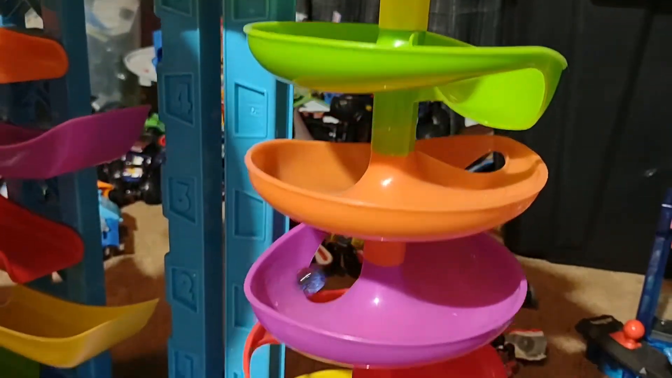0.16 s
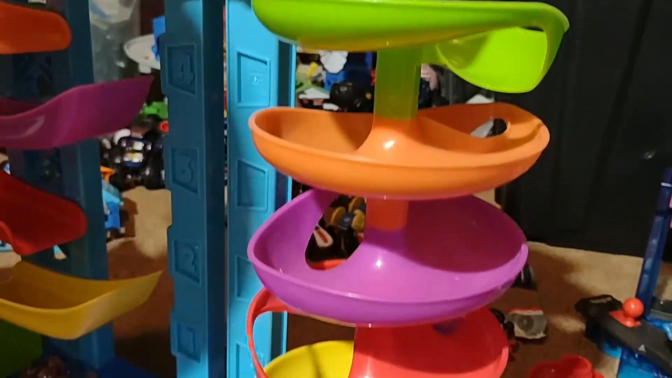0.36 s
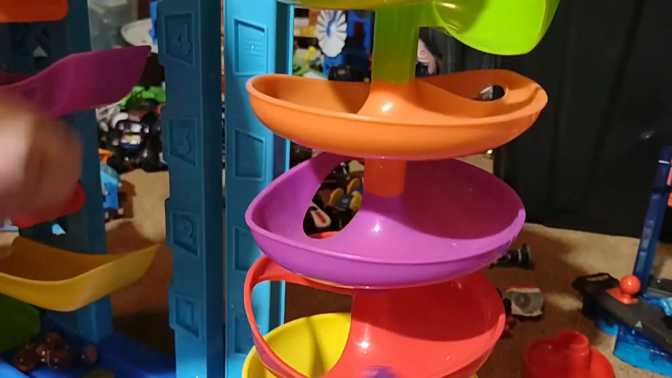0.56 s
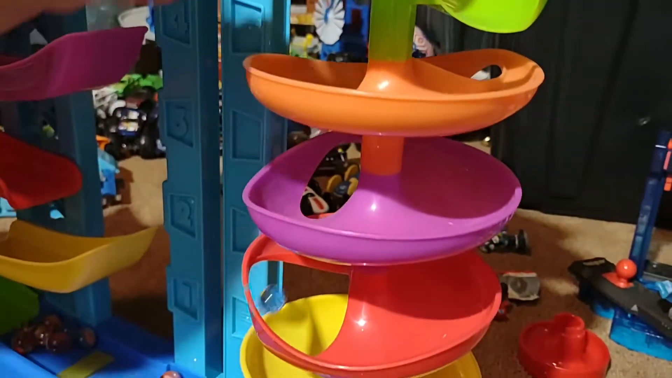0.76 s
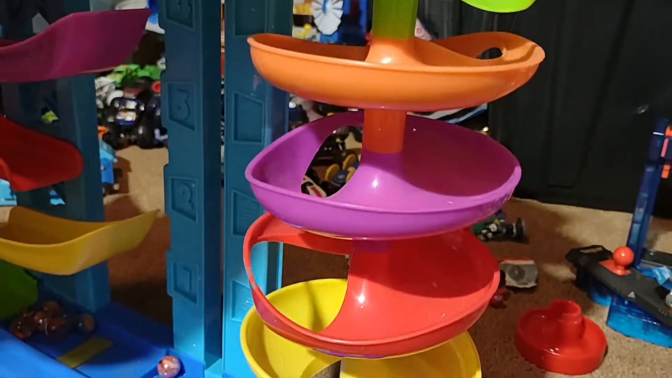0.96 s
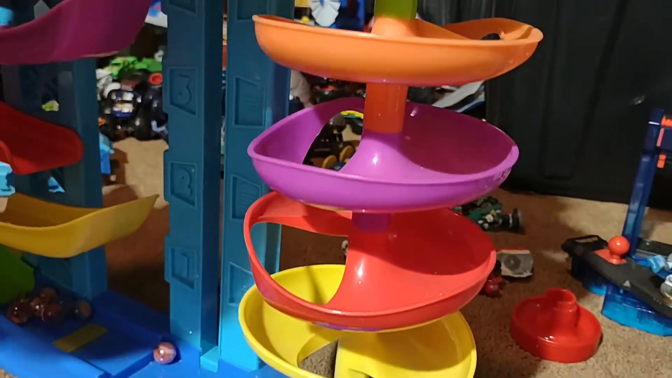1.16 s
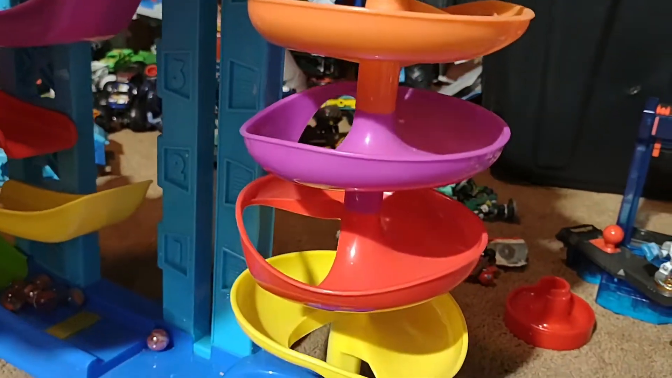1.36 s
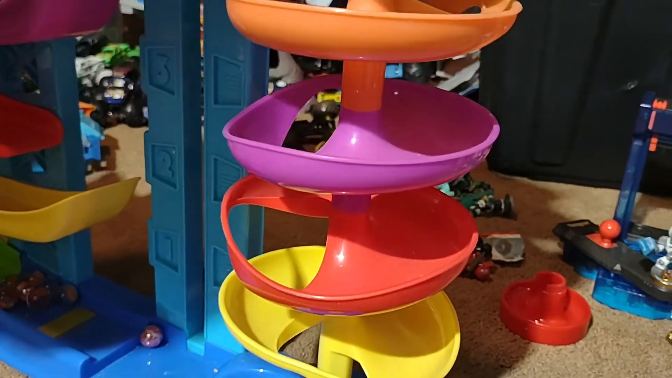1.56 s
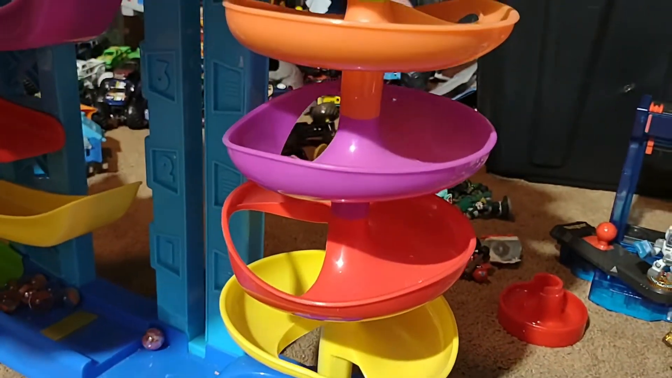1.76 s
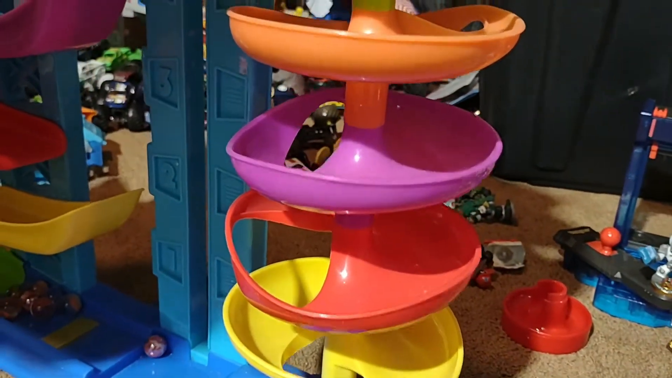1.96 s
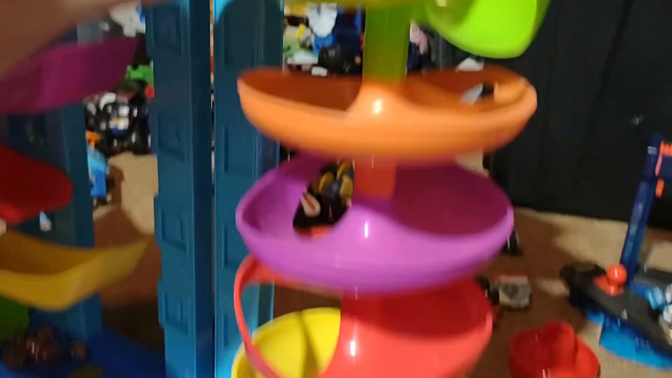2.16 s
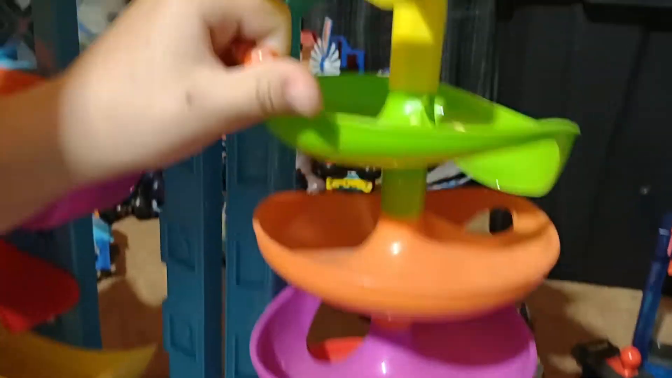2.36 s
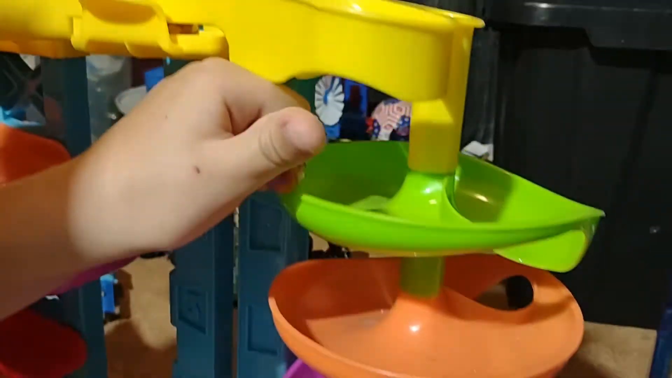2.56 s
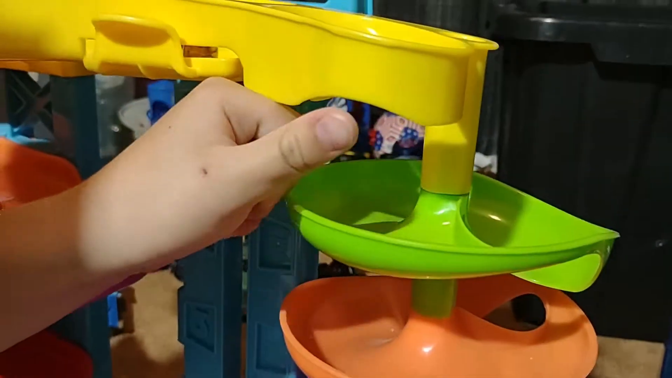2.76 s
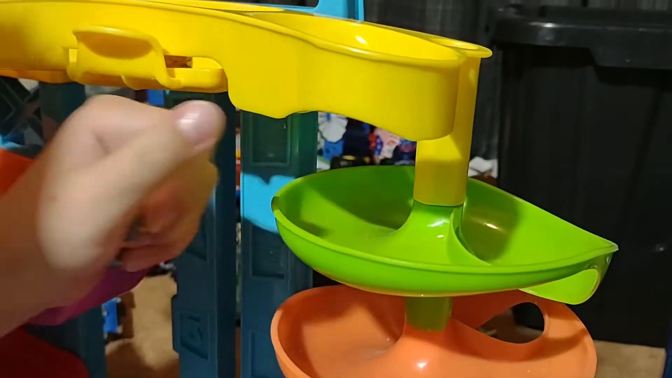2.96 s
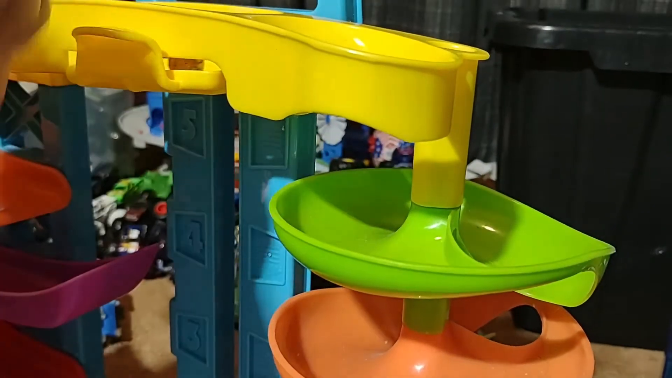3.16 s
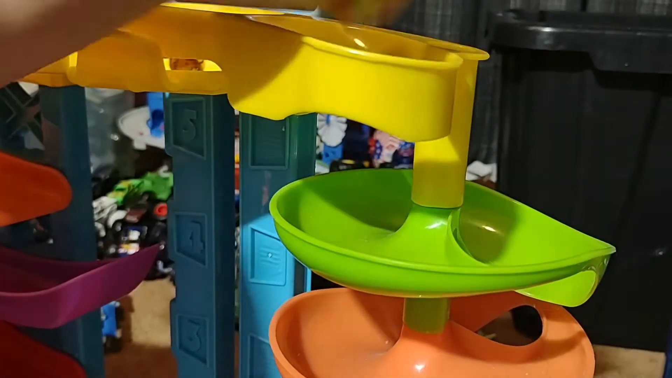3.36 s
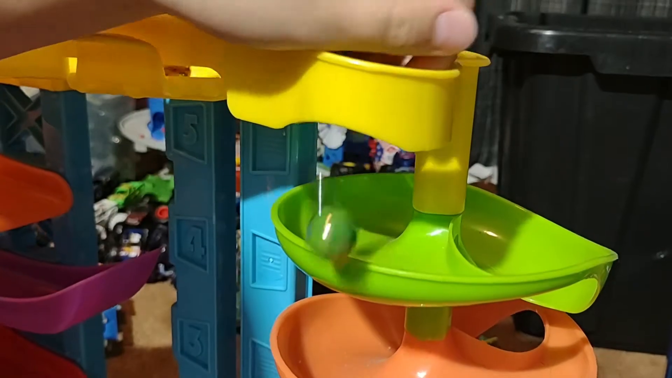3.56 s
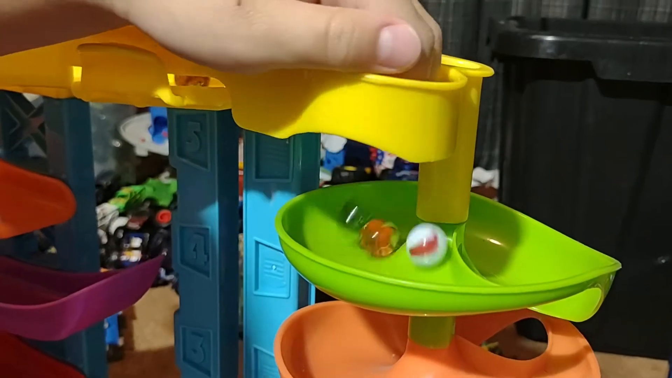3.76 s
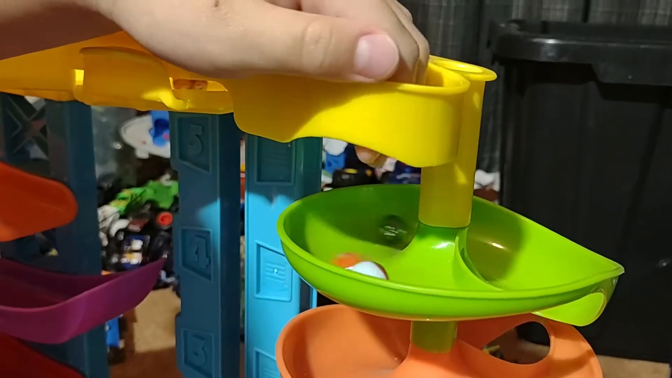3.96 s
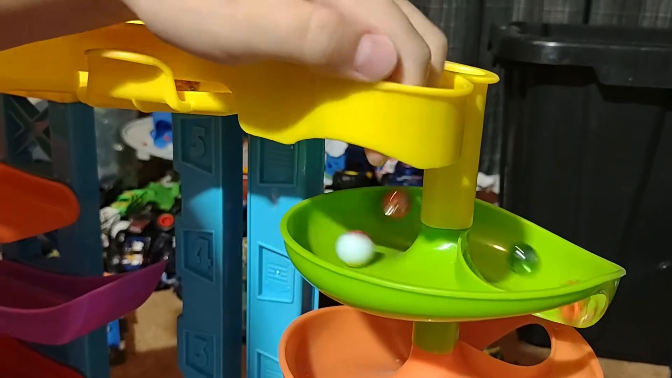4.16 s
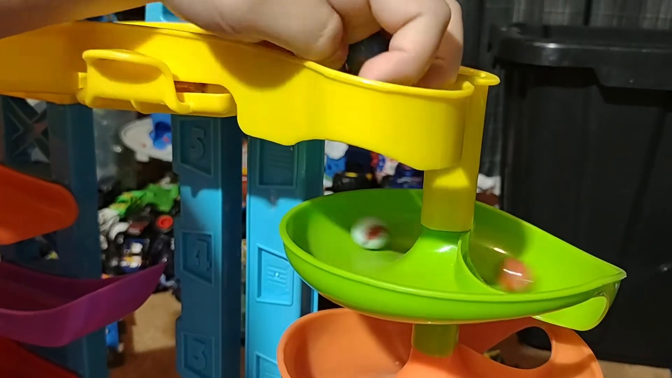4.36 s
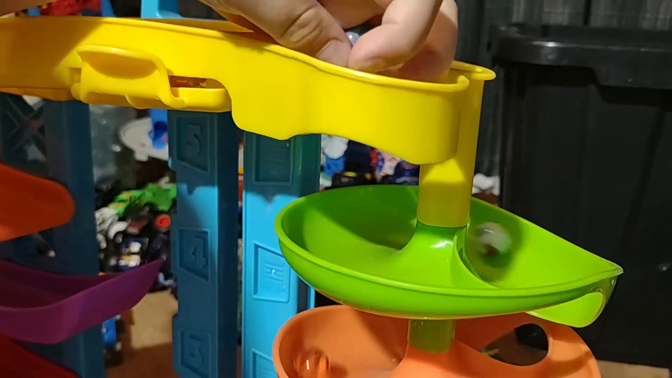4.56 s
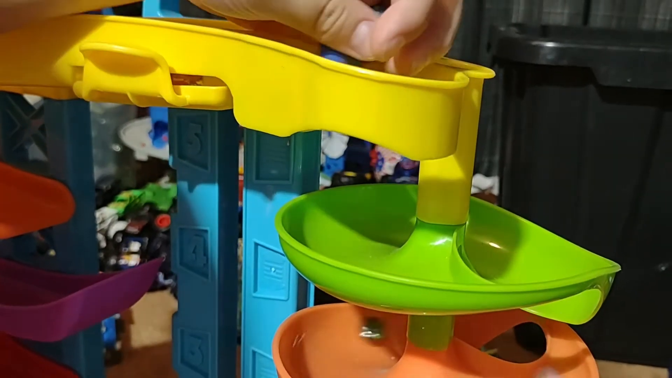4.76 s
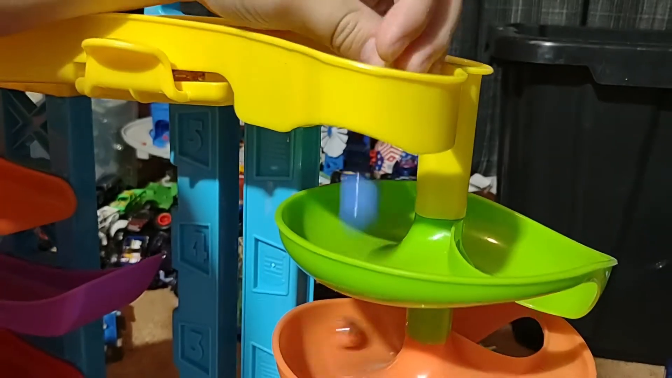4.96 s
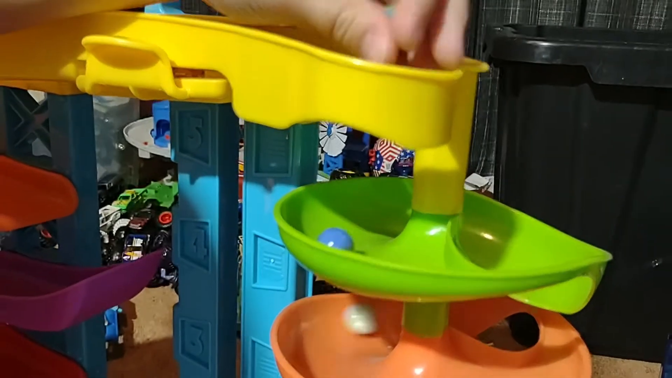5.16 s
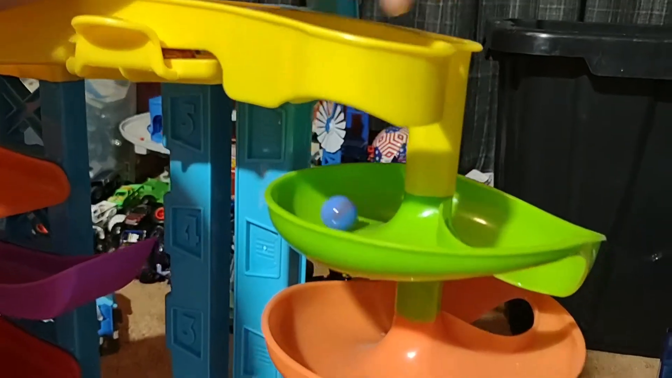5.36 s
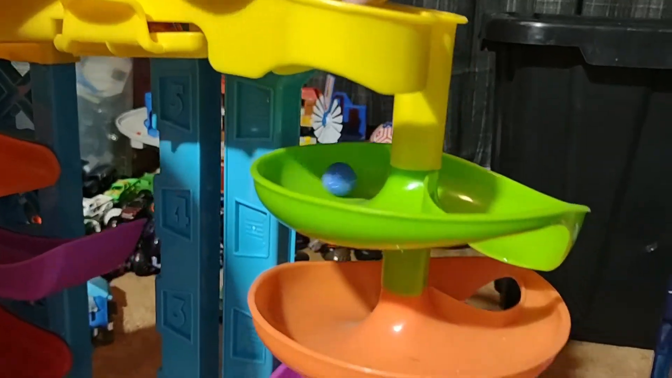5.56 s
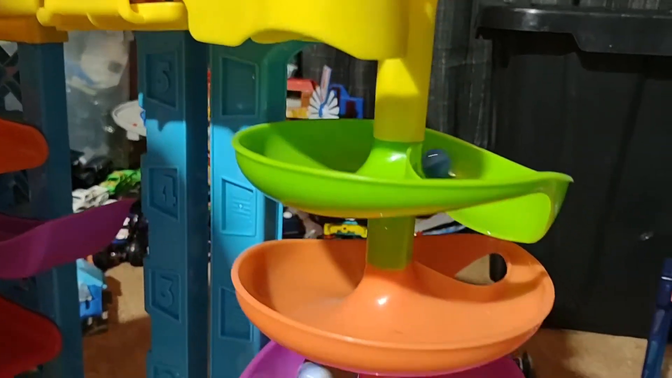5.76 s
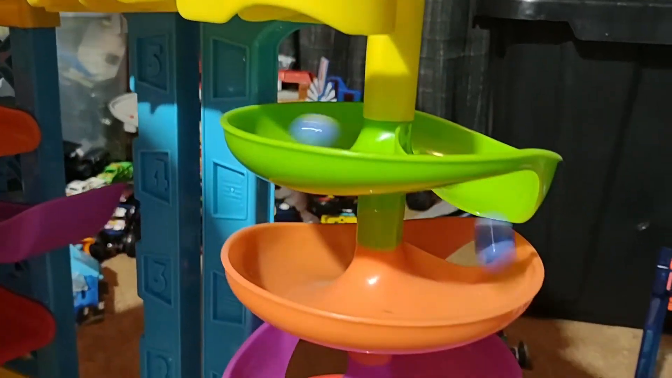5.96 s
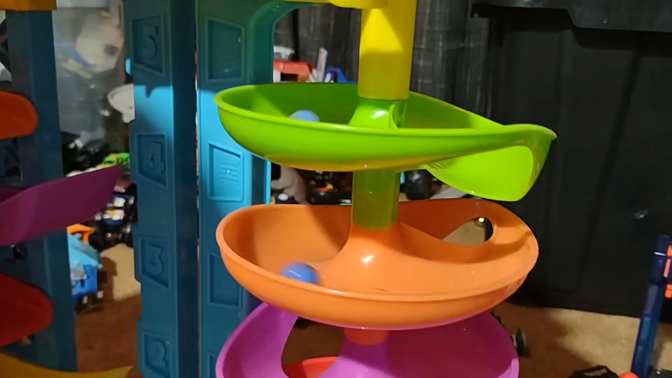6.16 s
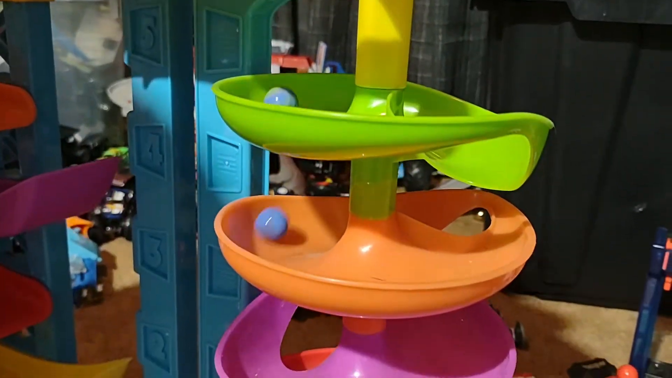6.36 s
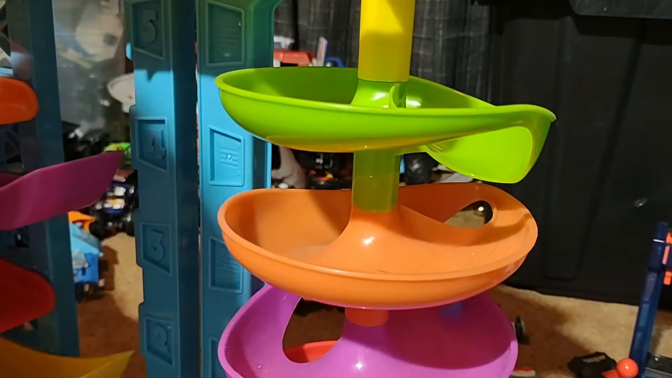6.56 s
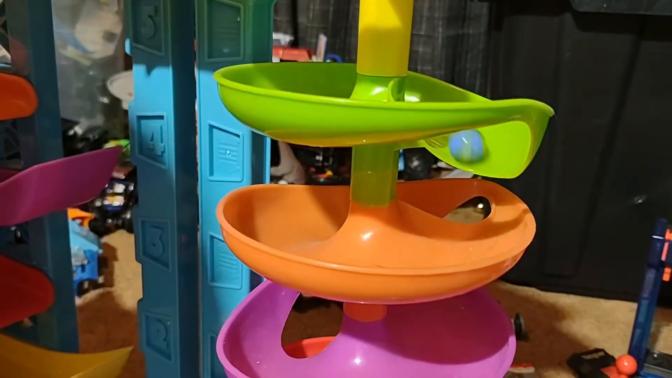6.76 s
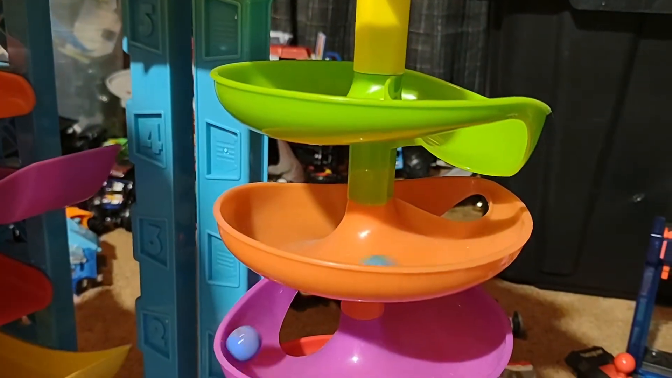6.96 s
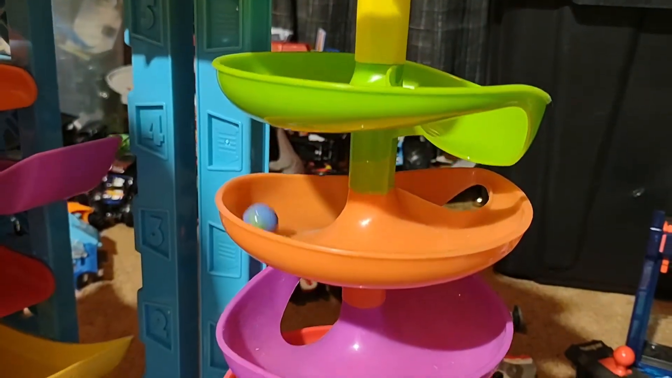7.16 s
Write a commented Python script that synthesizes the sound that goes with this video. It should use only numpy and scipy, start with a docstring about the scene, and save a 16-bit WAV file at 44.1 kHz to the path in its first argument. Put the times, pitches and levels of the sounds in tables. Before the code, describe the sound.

A toy marble tower of thin plastic trays stands close to a stereo microphone in a quiet indoor room with faint air noise and a low wavering hum. At 0 seconds marbles clack dryly and roll briefly, with further moderate knocks around 0.4 and a last few at 0.8 to 0.95. From 1 to about 3.4 it is nearly silent: tiny glass ticks, one light clack near 2.7, a soft bump at 3. At 3.45 marbles drop in, clattering sharply and quickly until 4.1. Spaced loud clacks follow at 4.3 and 4.4, then from 4.6 to 6.1 a dense run of bounces with lurching, grainy rolling. Around 6.3 to 6.6 hollow, clearer-pitched knocks tumble together. Last clacks fall near 6.7 and 7, with a little rolling and light glass ticks. Each hit has a short boxy plastic ring and quick diffuse tail.

```python
"""A dry clack of glass on plastic opens: marbles drop into a toy tower of spiral trays, close by in a playroom.
They bounce, click together, roll round the trays and fall on, in bursts with a pause between.
Contacts are bursts of shaped noise, prolonged by the decaying modes of the hollow tower and a diffuse tail.
Rolling is grainy, lurching noise; soft bumps are short decaying sines.
Beneath lies quiet air noise with a low, wavering hum."""
import sys
import numpy as np
from scipy import signal
from scipy.fft import rfft, irfft, next_fast_len
from scipy.io import wavfile
from scipy.ndimage import uniform_filter1d, map_coordinates

SR = 44100
rng = np.random.default_rng(int(sys.argv[2]) if len(sys.argv) > 2 else 0)


def waveform_to_disk(signal):
    """Save audio, clipped to [-1, 1], as 16-bit WAV at the path in sys.argv[1]."""
    frames = np.transpose(np.atleast_2d(signal))
    scaled = np.clip(frames, -1, 1) * 32767
    samples = np.round(scaled).astype(np.int16)
    wavfile.write(sys.argv[1], SR, samples)


N = 317961  # length in samples

# the quiet room's spectrum, relative: f/Hz, level/dB per Hz
AIR_SPECTRUM = [(25, -39.5), (45, -27), (70, -5.5), (130, -13.5), (170, -12), (240, -23.5), (350, -18.5),
                (700, -26), (1100, -30.5), (1450, -24.5), (2100, -30.5), (4000, -34.5), (10000, -40.5),
                (16000, -46.5)]
# low drones of the room, lifts on the air spectrum: f/Hz, width/Hz, lift/dB
HUM_DRONES = [(79, 29, 6.5), (122, 26, 18.5), (197, 28, 15)]
# soft blows to the toy: t/s, peak level/dB, f/Hz, t60/s
SOFT_BUMPS = [(0.262, -46.5, 185, 0.071), (0.933, -32.5, 381, 0.0705), (1.068, -47, 174.7, 0.05),
              (2.993, -35.5, 195.6, 0.018), (3.02, -50.5, 160, 0.17), (3.902, -26, 187, 0.023),
              (5.076, -31.5, 185, 0.066)]
# a tray under rolling glass, relative: f/Hz, level/dB per Hz
TRAY_SPECTRUM = [(40, -20), (80, -7), (125, 1.5), (200, -2), (300, -3.5), (450, -1), (570, -2), (700, 0),
                 (1000, -2), (1300, -0.5), (1680, -5.5), (2200, -7.5), (4000, -18), (16000, -49)]
# glass sliding on plastic, relative: f/Hz, level/dB per Hz
SCRAPE_SPECTRUM = [(500, -34.5), (1500, 0), (2800, -2), (5000, -2), (8000, 0), (12000, -4), (16000, -18.5)]
# marbles run round a tray: start t/s, end t/s, relative level/dB
TRAY_RUNS = [(.02, 0.26, -59.5), (0.535, 0.562, -53.5), (0.646, 0.709, -57), (0.756, .77, -60),
             (3.523, 3.98, -61), (4.126, 4.243, -46.5), (4.5, 5.29, -47), (5.38, 5.574, -52),
             (5.62, 5.674, -43), (5.742, 5.794, -45), (5.84, 5.862, -47), (6.14, 6.478, -49.5),
             (6.73, 6.825, -47), (7.05, 7.214, -54.5)]
# an average clack on a tray, relative: f/Hz, level/dB
CLACK_SPECTRUM = [(40, -46), (110, -28.5), (250, -19), (600, -14), (1000, -8), (1700, -2), (2800, -6),
                  (4000, -12), (5600, -15.5), (8000, -14.5), (11300, -20), (14000, -27.5), (16500, -36.5)]
# modes of the hollow tower: f/Hz, relative level/dB, t60/s
TOWER_MODES = [(350.3, 1.5, .25), (442.5, 3, 0.26), (513, 0, 0.35), (665, 1, 0.19), (932, -2, 0.26),
               (1126, -1.5, 0.1), (1378, -4.5, 0.13), (1460, 0, 0.19), (1685, 4, 0.079), (1734, -3, .13),
               (2087, -5, 0.088), (2170, -7.5, 0.1), (2336, -5, .15), (2648, -4.5, 0.18),
               (3300, -1.5, 0.14), (3730, -3.5, 0.084), (4126, -6, .06)]
# how long tower and room ring on: f/Hz, t60/s
TAIL_T60 = [(100, 0.24), (400, 0.26), (1600, 0.22), (4000, 0.19), (9000, 0.19), (16000, 0.24)]
# diffuse share of a contact, relative: f/Hz, level/dB
TAIL_SPECTRUM = [(100, 7), (200, 1), (400, -3.5), (900, -5), (1600, -7), (2800, -7.5), (5000, -9),
                 (9000, -10.5), (16000, -10.5)]
# left-right likeness of the direct sound: f/Hz, likeness (1 = same, 0 = unrelated)
DIRECT_LIKENESS = [(100, .9), (500, 1), (1200, 0.7), (2000, -0.042), (3500, 0.073), (9000, -0.021)]
# left-right likeness of diffuse sound: f/Hz, likeness (1 = same, 0 = unrelated)
DIFFUSE_LIKENESS = [(30, .5), (100, .87), (450, 0.76), (900, 0.31), (1700, 0.073), (4000, 0)]
# tower as the two microphones hear it: f/Hz, left minus right level/dB
STEREO_LEAN = [(100, -2), (300, 2.5), (600, -1), (1300, -3), (2600, -2), (5000, 0.5), (9000, 0),
               (14000, 1.5)]
# a marble lands on a tray or hits its rim: t/s, relative level/dB, knock (tray bass)/dB,
# hardness (treble)/dB, ring of the struck spot f/Hz
TRAY_CLACKS = [(.0014, 7, 11.5, 20, 4070), (.0615, 9, 8.5, 8, 7700), (0.0923, 0.5, 12.5, 4, 1300),
               (0.3313, 9, 7, 14, 6080), (0.3998, -3, 16, 17.5, 4460), (0.4495, 15.5, 2.5, -1.5, 950),
               (0.4625, 7, -5, -29, 1470), (0.837, 5, 14.5, 19.5, 4100), (0.898, 8.5, 5.5, 9.5, 1580),
               (1.3658, -17.5, 5, -11.5, 1080), (2.6587, 10, -10.5, -11, 2870),
               (3.458, 10.5, -11, -2, 2260), (3.5032, 13.5, -25, -5.5, 3280), (3.5633, 2.5, -24, -1, 3360),
               (3.581, 7, -20, -2, 2710), (3.595, -3, 14, 20, 3630), (3.6039, 20, -17, 13, 2790),
               (3.676, 22.5, -4.5, 6, 2850), (3.7215, 15, -3, 2, 2830), (3.7535, 9, 9.5, 14.5, 2300),
               (3.7679, 4, -15, 13, 2420), (3.774, 11.5, 9.5, 18, 2570), (3.8067, 17, 9, 12.5, 3360),
               (3.8739, 14.5, 11, 4.5, 3050), (3.923, 14, 2, -2, 1110), (3.9461, 1.5, 19.5, 4, 1100),
               (3.9665, 5.5, -14, 7.5, 2530), (4.0412, 27.5, -8, -2.5, 2600), (4.0597, 12, 13.5, 5, 1086),
               (4.3397, 19, 9.5, 2, 2050), (4.4159, 22, 5, 1.5, 2230), (4.5875, 1, 11.5, -4, 1620),
               (4.6485, 21.5, 5.5, 4, 1990), (4.6532, 13, 9, -5, 1660), (4.681, 11, -7, -10, 1180),
               (4.8593, 22.5, 2, -1, 2040), (4.8919, 7.5, 10, -4, 1730), (4.9306, 8.5, 10.5, 13.5, 1370),
               (4.9567, 20, 8.5, 3, 1660), (4.9962, 11, 10, 6.5, 10100), (5.0276, 11.5, 5, -15, 1700),
               (5.07, 20.5, 10.5, 9, 3000), (5.1319, 14.5, 1.5, -1.5, 2560), (5.227, 9.5, 11.5, 13, 1650),
               (5.2921, 18.5, 9, 2.5, 1700), (5.3954, 7, 15.5, 12, 1530), (5.4095, 19.5, 5, -2.5, 1470),
               (5.4507, 21.5, 4, 3, 1690), (5.5125, 22.5, 2.5, -30, 1720), (5.5192, 19, 0.5, 8.5, 2960),
               (5.745, 4.5, 14.5, 15, 850), (5.752, 10, 10.5, -8, 1850), (5.9061, 19.5, 6.5, 5.5, 1740),
               (5.9189, 0.5, 11, 25.5, 1350), (5.9438, 17, 5, 7.5, 1400), (5.9494, 17, 3.5, -19, 450),
               (5.9864, 16.5, -5, -8, 694), (6.0053, 18.5, 11, 14, 2880), (6.0278, 14, 7.5, 11, 425),
               (6.0703, 21.5, 0, 8, 1460), (6.077, 22, -14, -1.5, 1470), (6.1122, 10.5, 15.5, 7.5, 2820),
               (6.208, 15.5, 6.5, 11.5, 3270), (6.2667, 12.5, -17, -12, 3060),
               (6.5991, 8.5, 11.5, 1.5, 1530), (6.6623, 1, 22.5, 25, 2830), (6.6858, 19, 7.5, 2, 1575),
               (6.9622, 21.5, -1, -1.5, 1460), (7.0152, 9.5, 13.5, 5, 2290), (7.04, -6, 18, 23.5, 8140)]
# a marble drops into a hollow part, or strikes the column, and it rings at one clear pitch: # t/s, relative
# level/dB, hardness (treble)/dB, ring f/Hz
RINGING_HITS = [(.9279, 4.5, 15, 3650), (6.285, 16.5, 4.5, 3790), (6.377, 22.5, -8, 3900),
                (6.3913, 10, 2, 656), (6.4743, 19, -0.5, 867), (6.498, 9, 21.5, 820),
                (6.5179, 0.5, 29, 700), (6.5421, 16.5, 2, 815), (6.5499, 10.5, 13, 1040),
                (6.575, 6, 6, 1020)]
# marbles touch lightly, glass on glass: t/s, relative level/dB, ring f/Hz
GLASS_TICKS = [(0.174, -24, 6850), (0.1896, -24.5, 6050), (1.2855, -17, 4400), (1.388, -36, 5700),
               (1.4308, -28.5, 4690), (1.7947, -47, 8830), (2.181, -42, 6650), (3.085, -41, 3900),
               (3.42, -28.5, 4600), (6.912, -14, 3330), (7.0597, -11, 10500), (7.19, -20, 9900)]

CLACK_RING_DB = 5.5  # how far the struck spot stands out
DROP_KNOCK_DB, DROP_RING_DB, DROP_TAIL_DB = 5, 16.5, 1.5  # bass, ring, tail against a clack's
TICK_KNOCK_DB, TICK_HARD_DB, TICK_RING_DB = 0, 20, 14  # bass, treble, ring
# a marble hops once after a clack: median flight, log scatter, loss
REBOUND_S, REBOUND_SPREAD, REBOUND_LOSS_DB = 0.013, 0.35, 17.5
PAN_SPREAD_DB = 3  # contacts fall to either side of the column
RUN_ATTACK_S, RUN_RELEASE_S = 0.023, 0.055  # rise up to the start, time constant after the end
TOP_HZ = 16000  # band limit


def amp(db):
    """Decibels to linear gain."""
    return 10 ** (np.asarray(db) / 20)


def unit(x):
    """Scale to rms 1."""
    return x / np.sqrt(np.mean(x ** 2) + 1e-20)


def along(points, hz):
    """Read a curve of (Hz, value) points on a log frequency axis."""
    f, value = np.transpose(points)
    return np.interp(np.log(hz + 1), np.log(f + 1), value)


def wobble(rate):
    """A smooth random curve with rate knots a second."""
    knots = rng.standard_normal(int(N * rate / SR) + 4)
    return map_coordinates(knots, [np.arange(N) * rate / SR])


def filtered(x, response):
    """Shape a sound by a gain response over frequency."""
    m = next_fast_len(N + SR // 2)
    hz = np.fft.rfftfreq(m, 1 / SR)
    return irfft(rfft(x, m) * response(hz), m)[..., :N]


def causal(db):
    """The minimum-phase response with these dB gains, so that energy comes early."""
    cepstrum = irfft(np.log(amp(db)))
    half = len(cepstrum) // 2
    cepstrum[1:half] *= 2
    cepstrum[half + 1:] = 0
    return np.exp(rfft(cepstrum))


def stereo(pair, alike, hz):
    """Blend two unrelated spectra into left and right with a given likeness."""
    turn = np.arccos(np.clip(along(alike, hz), -0.99, 0.99)) / 2
    mid = pair[0] * np.cos(turn)
    side = pair[1] * np.sin(turn)
    return np.array([mid + side, mid - side])


def coloured(pair, colour):
    """Turn two noises into diffuse stereo of rms 1; colour gives dB for Hz."""
    m = next_fast_len(N + SR // 2)
    hz = np.fft.rfftfreq(m, 1 / SR)
    spectra = stereo(rfft(pair, m), DIFFUSE_LIKENESS, hz) * amp(colour(hz))
    return unit(irfft(spectra, m)[:, :N])


def add(track, s, sound):
    """Mix a sound in at time s."""
    part = track[..., max(round(s * SR), 0):][..., :sound.shape[-1]]
    part += sound[..., :part.shape[-1]]


def room_tone(level_db):
    """Soft air noise, swelling at a few low pitches into a wavering hum."""
    def colour(hz):
        drones = sum(db / (1 + (2 * (hz - centre) / width) ** 2) for centre, width, db in HUM_DRONES)
        return along(AIR_SPECTRUM, hz) + drones

    return amp(level_db) * coloured(rng.standard_normal((2, N)), colour)


def bumps(rise_cycles):
    """Soft blows push the toy for a cycle or a few, with no click."""
    out = np.zeros(N)
    t = np.arange(SR // 4) / SR
    for s, db, hz, t60 in SOFT_BUMPS:
        rise = 1 - np.exp(-(t * hz / rise_cycles) ** 2)
        push = np.sin(2 * np.pi * hz * t) * amp(-60 * t / t60) * rise
        add(out, s, amp(db) * push / np.abs(push).max())
    return out


def run_strength():
    """Each run builds up, holds its level and dies away as the marble leaves."""
    t = np.arange(N) / SR
    strength = np.zeros(N)
    for start, end, db in TRAY_RUNS:
        attack = np.clip(1 + (t - start) / RUN_ATTACK_S, 0, 1)  # full level at the start time
        release = np.exp(-np.maximum(t - end, 0) / RUN_RELEASE_S)
        strength += amp(db) * attack * release
    return strength


def tower_db(hz, peak_db):
    """The tower's modes as peaks in dB under a steady drive; longer rings make narrower peaks."""
    return sum(peak_db * amp(db) / (1 + ((hz - centre) * t60 / 4) ** 2)
               for centre, db, t60 in TOWER_MODES)


def rolling(rumble_db, scrape_db, grit_db, lurch_db, crackle_db):
    """Glass rolls over tiny bumps in the plastic: a lurching, grainy rumble with a fine scrape on top."""
    grit = rng.standard_normal((2, N)) * amp(grit_db * wobble(300))
    crackle = rng.standard_normal((2, N)) * amp(crackle_db * wobble(310))
    rumble = coloured(grit, lambda hz: along(TRAY_SPECTRUM, hz) + tower_db(hz, peak_db=7.0))
    scrape = coloured(crackle, lambda hz: along(SCRAPE_SPECTRUM, hz))
    surface = amp(rumble_db) * rumble + amp(scrape_db) * scrape
    return run_strength() * amp(lurch_db * wobble(40)) * surface


def contacts():
    """Every blow as (t/s, level dB, knock dB, hardness dB, ring Hz, ring dB, tail dB)."""
    flights = REBOUND_S * np.exp(REBOUND_SPREAD * rng.standard_normal(len(TRAY_CLACKS)))
    blows = [(*clack, CLACK_RING_DB, 0) for clack in TRAY_CLACKS]
    hops = [(s + flight, db - REBOUND_LOSS_DB, *colour)
            for flight, (s, db, *colour) in zip(flights, blows)]
    drops = [(s, db, DROP_KNOCK_DB, hard_db, hz, DROP_RING_DB, DROP_TAIL_DB)
             for s, db, hard_db, hz in RINGING_HITS]
    ticks = [(s, db, TICK_KNOCK_DB, TICK_HARD_DB, hz, TICK_RING_DB, 0) for s, db, hz in GLASS_TICKS]
    return blows + drops + ticks + hops


def flex(t, hz, rise, t60, even_hz):
    """Bending waves criss-cross the thin tray for a few ms: two noise spectra, evened to a flat average."""
    burst = rng.standard_normal((2, len(t))) * (1 - np.exp(-t / rise)) * amp(-60 * t / t60)
    waves = rfft(burst)
    power = uniform_filter1d(np.abs(waves) ** 2, max(int(even_hz / hz[1]), 1), axis=1)
    return waves * [causal(-10 * np.log10(np.abs(p) + 1e-9)) for p in power]


def afterring(hz, build, size):
    """The room answers after a short gap, each frequency dying at its own speed: two flat-average spectra."""
    f, t, cells = signal.stft(rng.standard_normal((2, size)), SR, nperseg=256)
    decay = amp(-60 * t / along(TAIL_T60, f)[:, None])
    fade = decay * (1 - np.exp(-(t / build) ** 4))
    fade /= np.sqrt(np.mean(fade ** 2, axis=1, keepdims=True) * size)
    return rfft(signal.istft(cells * fade, SR, nperseg=256)[1][:, :size])


def chime(modes, t, scatter_db):
    """Decaying modes, each of unit energy at 0 dB, struck at new strengths: two spectra."""
    hz, db, t60 = np.transpose(modes)
    fade = np.exp(-np.log(1000) * t / t60[:, None])
    energy = (fade ** 2).sum(axis=1) / 2
    size = amp(db + scatter_db * rng.standard_normal(len(hz))) / np.sqrt(energy)
    # short waves reach the two microphones out of step
    phase = rng.uniform(0, 2 * np.pi, len(hz)) + rng.standard_normal((2, len(hz))) * hz / 2400
    turn = 2 * np.pi * hz[:, None] * t
    sines = (size * np.cos(phase)) @ (fade * np.sin(turn))
    cosines = (size * np.sin(phase)) @ (fade * np.cos(turn))
    return rfft(sines + cosines)


def clacks(knock_hz, hard_hz, dull_hz, ring_octaves, direct_db, tail_db, modes_db,
           spot_db, spot_t60, spot_fade, size):
    """Each contact flexes a tray; its colour depends on where and how hard the glass lands."""
    out = np.zeros((2, N))
    t, hz = np.arange(size) / SR, np.fft.rfftfreq(size, 1 / SR)
    bass = 1 / (1 + (hz / knock_hz) ** 2)
    treble = 1 - 1 / (1 + (hz / hard_hz) ** 3)
    top = 1 - 1 / (1 + (hz / dull_hz) ** 4)
    diffuse = amp(tail_db + along(TAIL_SPECTRUM, hz))
    for s, db, knock_db, hard_db, ring_hz, ring_db, room_db in contacts():
        pan_db = PAN_SPREAD_DB * rng.standard_normal()
        spot = 1 / (1 + (np.log2((hz + 1) / ring_hz) / ring_octaves) ** 2)
        # a soft contact lasts longer and loses the top as well
        hardness = hard_db * treble + min(hard_db, 0) * top
        colour = causal(db + along(CLACK_SPECTRUM, hz) + knock_db * bass + hardness + ring_db * spot)

        # the plastic damps short waves sooner than long ones
        slow = flex(t, hz, rise=0.0008, t60=0.015, even_hz=900)
        fast = flex(t, hz, rise=0.0015, t60=0.011, even_hz=1800)
        waves = np.sqrt(1 - treble) * slow + np.sqrt(treble) * fast
        direct = stereo(waves, DIRECT_LIKENESS, hz)

        # the room gathers sound from the whole tower, so the struck spot stands out less in it
        answer = stereo(afterring(hz, build=0.0081, size=size), DIFFUSE_LIKENESS, hz)
        tail = amp(room_db - spot_fade * ring_db * spot) * diffuse * answer

        modes = TOWER_MODES + [(ring_hz, spot_db, spot_t60)]
        ring = amp(modes_db) * chime(modes, t, scatter_db=4.5)
        sides = amp(direct_db + np.array([[pan_db], [-pan_db]]) / 2)
        add(out, s, irfft(colour * (sides * direct + tail + ring)))
    return out


def scene():
    """The tower stands just in front of the microphones, over bumps and room tone."""
    marbles = clacks(knock_hz=900, hard_hz=4730, dull_hz=9300, ring_octaves=0.36,
                     direct_db=-0.5, tail_db=-0.5, modes_db=-30,
                     spot_db=3.5, spot_t60=0.042, spot_fade=0.2, size=14400)
    marbles += rolling(rumble_db=2.5, scrape_db=-11, grit_db=4, lurch_db=2.5, crackle_db=4.5)
    halves = np.array([[0.5], [-0.5]])  # the lean is shared between left and right
    heard = filtered(marbles, lambda hz: amp(along(STEREO_LEAN, hz) * halves))
    return heard + bumps(rise_cycles=0.33) + room_tone(level_db=-61.5)


def record(dry):
    """Round the sharpest peaks off at full scale, then cut steeply above the band limit."""
    rounded = dry / (1 + np.abs(dry) ** 6) ** (1 / 6)
    return filtered(rounded, lambda hz: 1 / np.sqrt(1 + (hz / TOP_HZ) ** 200))


dry = scene()
out = record(dry)
waveform_to_disk(out)
```